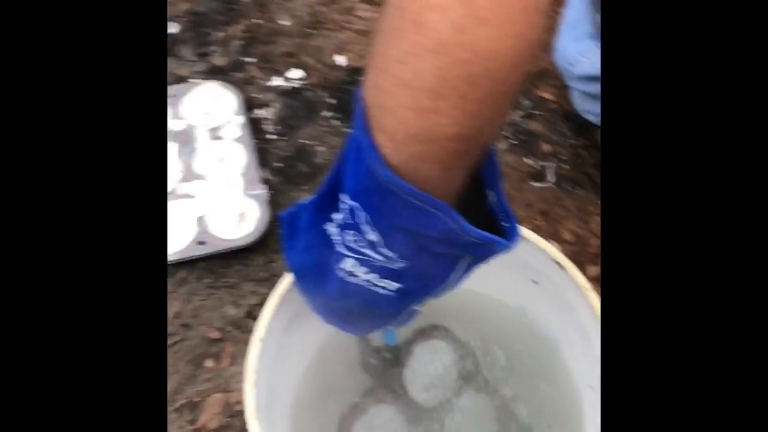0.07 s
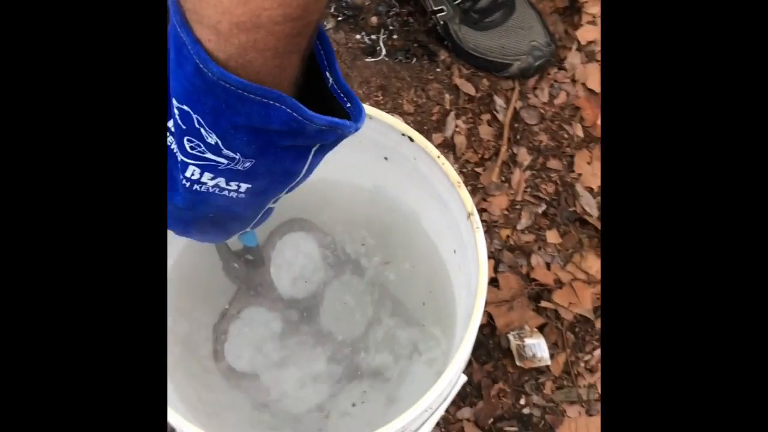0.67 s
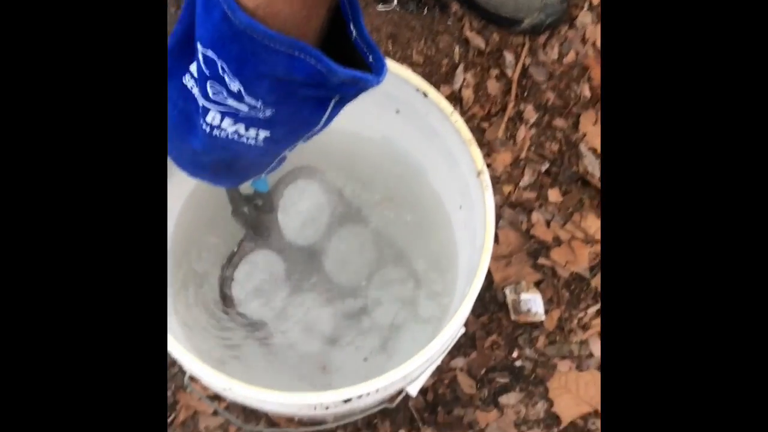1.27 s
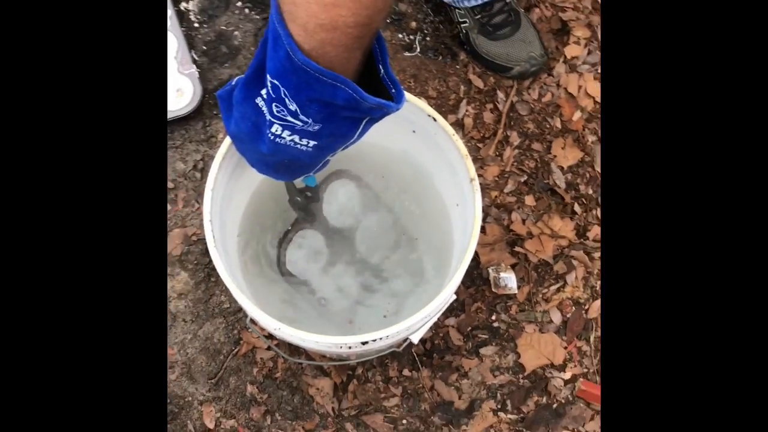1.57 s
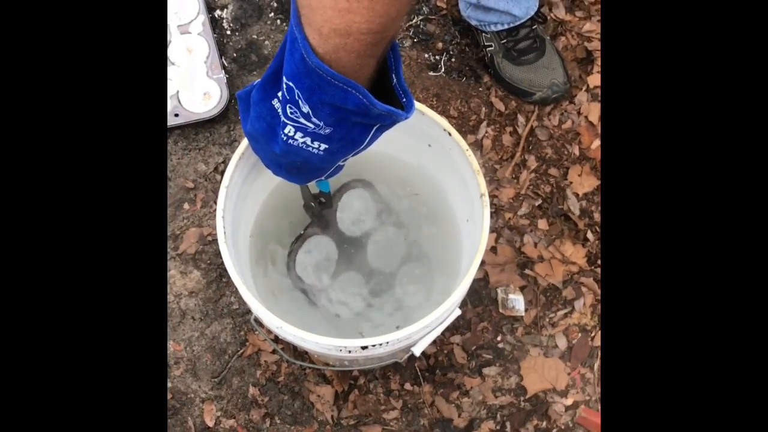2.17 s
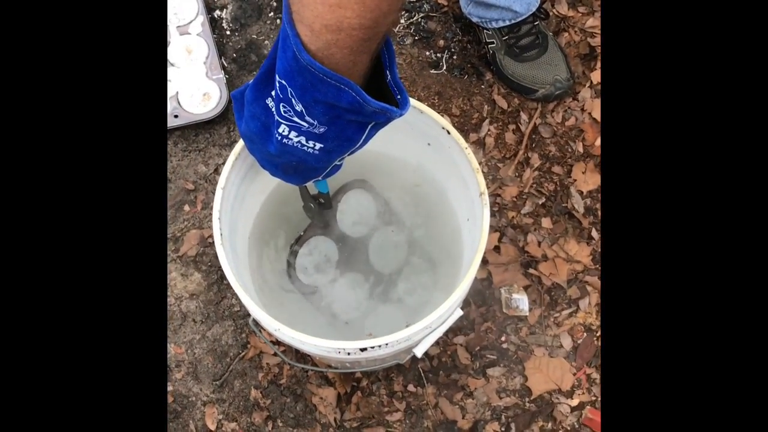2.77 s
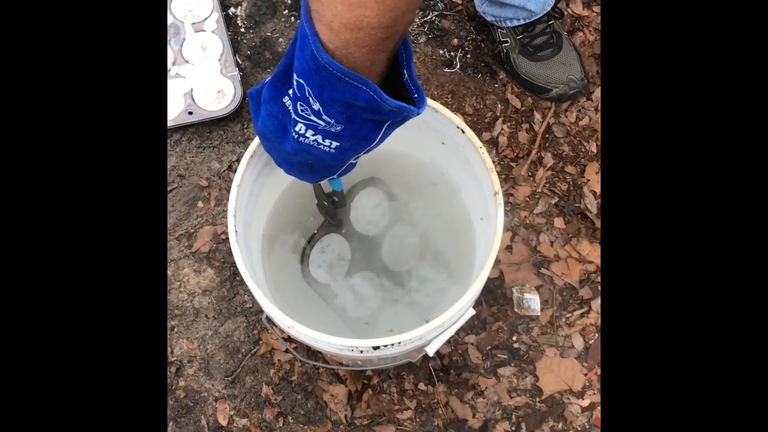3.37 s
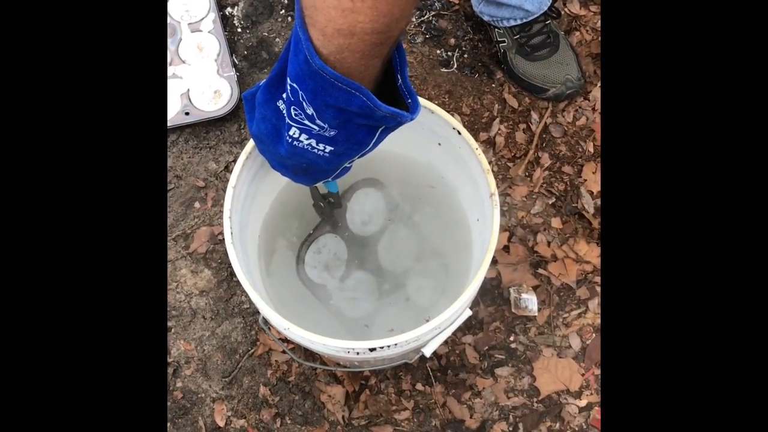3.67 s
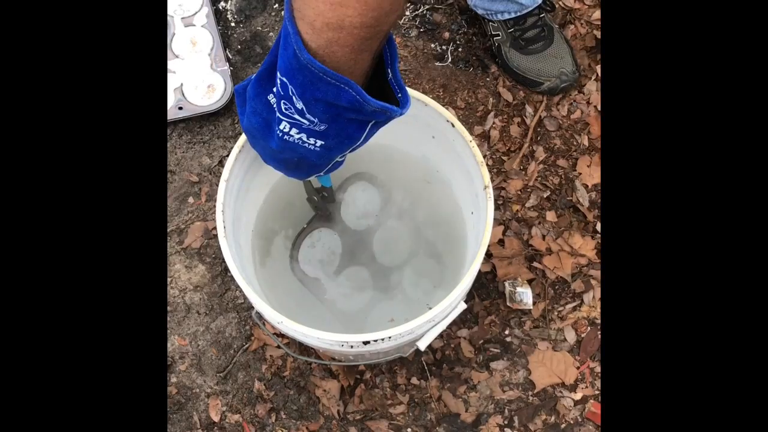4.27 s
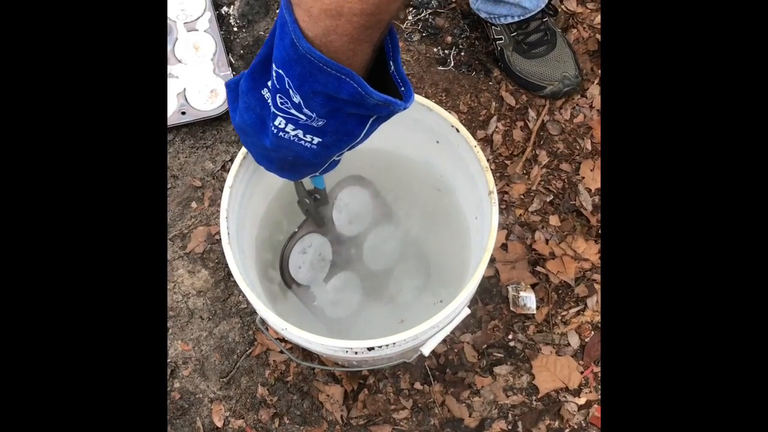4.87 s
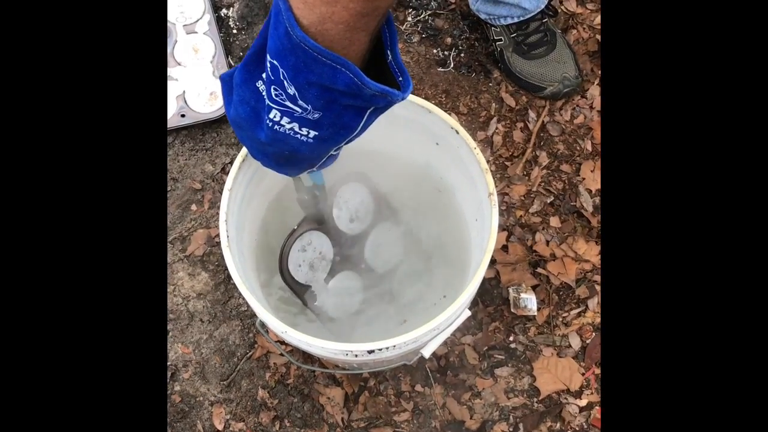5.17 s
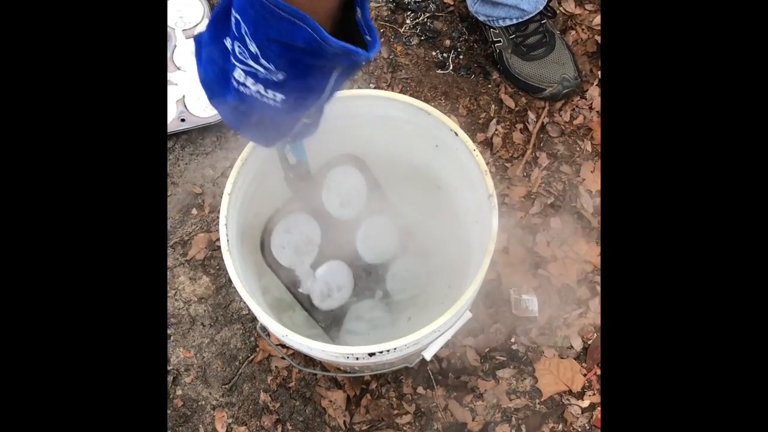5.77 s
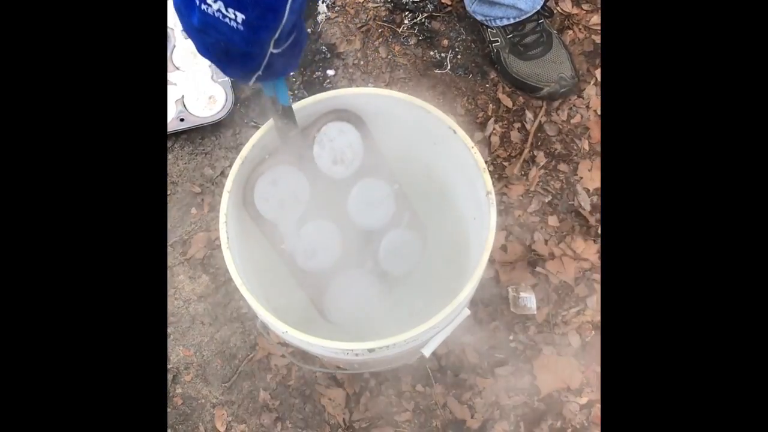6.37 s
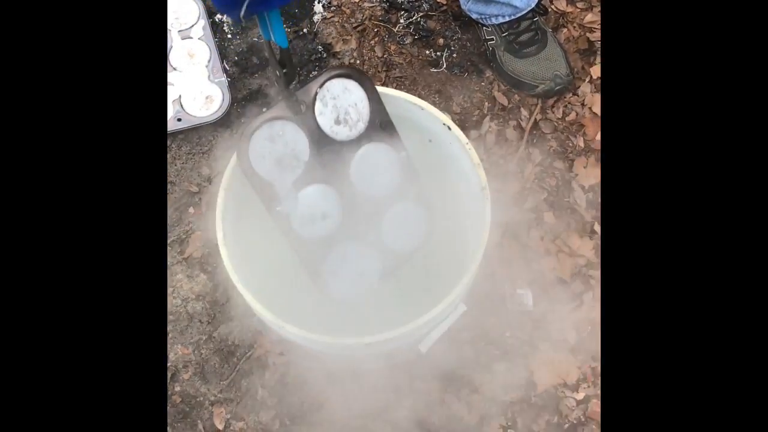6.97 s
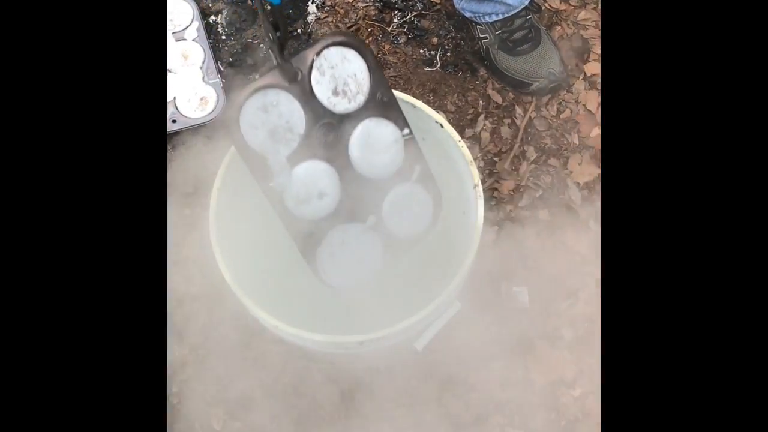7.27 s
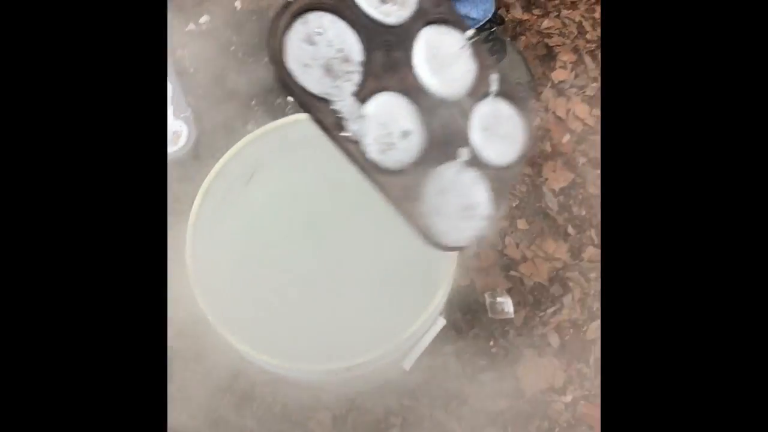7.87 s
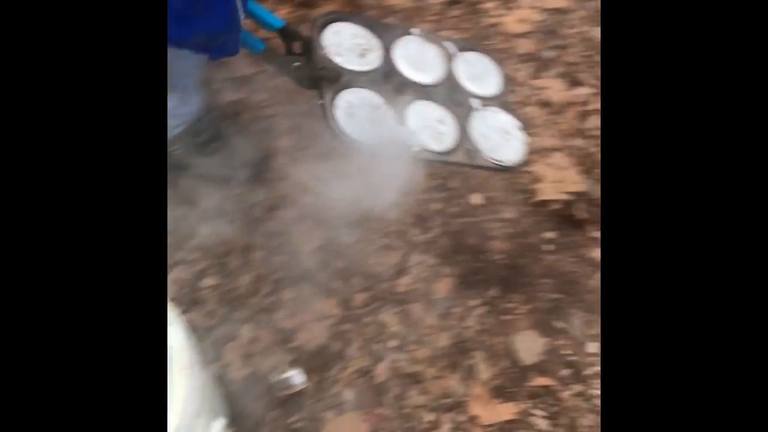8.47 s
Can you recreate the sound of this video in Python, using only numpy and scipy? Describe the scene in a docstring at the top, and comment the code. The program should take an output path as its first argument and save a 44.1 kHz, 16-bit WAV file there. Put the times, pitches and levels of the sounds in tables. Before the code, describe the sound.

Water gurgles low around a quenched hot muffin tin, breaking into hissing, popping knocks and dry snaps over a faint roar.

```python
"""A hot aluminium tin is quenched in a bucket of water outdoors. A vapour film wraps it and sheds bubbles
that make the bucket rumble; then water touches the metal and sizzles. As the tin is lifted, steam pockets
collapse with sharp knocks, thinning out to spits. Something roars and whines faintly nearby, and one soft
footstep falls near the end."""
import sys
import numpy as np
from scipy import signal
from scipy.fft import rfft, irfft, next_fast_len
from scipy.io import wavfile
from scipy.ndimage import map_coordinates

SR = 44100
rng = np.random.default_rng(int(sys.argv[2]) if len(sys.argv) > 2 else 0)


def inscribe(sig):
    """Save sig as 16-bit PCM at rate SR to the path in sys.argv[1].

    A 1-D sig is mono; a 2-D sig holds one channel per row.
    Samples are clipped to [-1, 1] before scaling.
    """
    pcm = np.round(np.clip(np.atleast_2d(sig).T, -1, 1) * 32767)
    wavfile.write(sys.argv[1], SR, pcm.astype(np.int16))


N = 379260

# steam pockets collapsing: start_s, knock_db, boom_offset_db, spray_offset_db
COLLAPSES = [(4.869, -13, -8, -23), (4.907, -9.5, -9.5, -18), (4.953, -13, -7.5, -17),
             (5.089, -17, -7.5, -19), (5.16, -11, -9.5, -12), (5.206, -18, -5.5, -22),
             (5.232, -15, -10, -15.5), (5.278, -13.5, -9, -11), (5.296, -10.5, -19, -12.5),
             (5.414, -14, -13, -24), (5.433, -20, -3.5, -3), (5.463, -8, -11, -14), (5.555, -12, -20, -18),
             (5.593, -5, -11, -12), (5.723, -9.5, -5, -11.5), (5.748, -10.5, -11.5, -46),
             (5.796, -12, -14, -30), (5.863, -7, -9.5, -11.5), (5.962, -17.5, -7.5, -6),
             (6.066, -5.5, -4.5, -12.5), (6.244, -14, -14, -11.5), (6.355, -9.5, -9.5, -17),
             (6.484, -11, -13.5, -14), (6.601, -11, -12.5, -21), (6.73, -6.5, -10.5, -19.5),
             (6.739, -11.5, -14, -13.5), (6.75, -7.5, -10.5, -21), (6.769, -11, -15, -15),
             (6.82, -24, -25, -5), (6.849, -19.5, -12, -15), (6.902, -20.5, -11, -8.5),
             (7.022, -10, -13, -19), (7.136, -24, -13, -7), (7.16, -23, -18, -6), (7.259, -14, -17.5, -14),
             (7.356, -19, -38, -17), (7.405, -18.5, -23, -9), (7.522, -18.5, -22, -9),
             (7.67, -11.5, -22.5, -16), (7.798, -12.5, -38, -15.5), (7.993, -10, -25, -19.5)]
# tin leaving the water: time_s, share_above_surface
LIFT = [(6.05, 0.04), (6.5, 0.83)]
# struck bucket, long ring and short thump: pitch_hz, level_db, t60_s
BOOM_MODES = [(339.4, -4.5, 0.09), (366, 2, 0.024)]
# wet cups of the tin: pitch_hz, level_db, t60_s
CUP_MODES = [(900, -13.5, 0.063), (1264, -1, 0.072), (1730, -4.5, 0.039)]
# resonances around a burst above water: pitch_hz, width_hz, level_db
LIFTED_MODES = [(652, 120, -1), (967, 380, 2), (1262, 176, -1.5), (1810, 440, -9)]
# spray and fizz: frequency_hz, level_db
SPRAY_SPECTRUM = [(300, -19), (1400, 10.5), (2050, 3.5), (2800, 5.5), (3400, -2), (4100, 4.5), (5000, -3.5),
                  (6150, 1.5), (8200, -5), (9500, -5), (10400, -9), (12000, -2.5), (16000, -7.5)]

SLAM_SPIKE = 1.4  # pressure spike re the cluster after it
BOOM_SCATTER, CUP_SCATTER = 0.034, 0.01  # log spread of pitch
BOOM_ATTACK_S = 0.00076


def amp(db):
    """Decibels to gain."""
    return 10 ** (np.asarray(db) / 20)


def unit(x):
    """Scale to rms 1."""
    return x / np.sqrt(np.mean(x ** 2) + 1e-20)


def curves(rows):
    """One value per sample for each column after the time."""
    time_s, *columns = np.transpose(rows)
    return [np.interp(np.arange(N) / SR, time_s, column) for column in columns]


def wobble(rate_hz):
    """Smooth random curve."""
    knots = rng.standard_normal(int(N * rate_hz / SR) + 4)
    return map_coordinates(knots, [np.arange(N) * rate_hz / SR])


def bubble_times(rate_hz, regularity):
    """Start times of a loosely periodic stream."""
    times_s = np.cumsum(rng.gamma(regularity, 1 / (regularity * rate_hz), 1000))
    return times_s[times_s < (N - 1) / SR]


def add(track, start_s, sound):
    """Mix a sound into a track."""
    span = track[max(round(start_s * SR), 0):][:len(sound)]
    span += sound[:len(span)]


def butter(x, hz, kind, order):
    """Causal low-pass or high-pass."""
    return signal.sosfilt(signal.butter(order, hz, kind, fs=SR, output="sos"), x)


def coloured(x, spectrum):
    """Minimum-phase filter of unit energy."""
    size = 8192
    hz, db = np.transpose(spectrum)
    gain = amp(np.interp(np.log(np.fft.rfftfreq(size, 1 / SR) + 1), np.log(hz), db))
    cepstrum = irfft(np.log(gain))
    cepstrum[1:size // 2] *= 2
    cepstrum[size // 2 + 1:] = 0
    kernel = irfft(np.exp(rfft(cepstrum)))
    return signal.fftconvolve(x, kernel / np.linalg.norm(kernel))[:N]


def resonate(x, modes):
    """Resonator bank of unit energy."""
    size = next_fast_len(N + SR // 4)
    f = np.fft.rfftfreq(size, 1 / SR)
    response = sum(amp(db) * 1j * f * width_hz / (hz * hz - f * f + 1j * f * width_hz)
                   for hz, width_hz, db in modes)
    response /= np.sqrt(np.mean(np.abs(response) ** 2))
    return irfft(rfft(x, size) * response, size)[:N]


def ring(modes, scatter, attack_s):
    """One blow on damped modes of scattered pitch and strength, peak 1."""
    t = np.arange(SR // 8) / SR
    hz, db, t60_s = np.transpose(modes)[:, :, None]
    detune, strength = rng.standard_normal((2, len(modes), 1))
    envelopes = amp(db + 2.7 * strength - 60 * t / t60_s)
    tone = (envelopes * np.sin(2 * np.pi * hz * np.exp(scatter * detune) * t)).sum(0)
    tone *= 1 - np.exp(-t / attack_s)
    return tone / np.abs(tone).max()


def burst(t60_s, clump_db=4, hold_s=0):
    """Cluster of tiny implosions that holds and dies, energy 1."""
    t = np.arange(SR // 8) / SR
    clumps = np.interp(t, np.linspace(0, t[-1], 80), rng.standard_normal(80))
    decay_db = 60 * np.maximum(t - hold_s, 0) / t60_s
    noise = rng.standard_normal(len(t)) * amp(clump_db * clumps - decay_db)
    return noise / np.linalg.norm(noise)


def implosion(t60_s, spike=SLAM_SPIKE):
    """Pressure spike followed by a cluster of tiny collapses, energy 1."""
    click = burst(t60_s)
    click[0] += spike
    return click / np.linalg.norm(click)


def hollow(x):
    """Bucket resonances sink as the tin rises; the water muffles what lies above them."""
    # resonances deep in the bucket: pitch_hz, width_hz, level_db
    sunk_modes = [(535, 57, 8.5), (831, 63, 8.5), (985, 370, -1), (1296, 43, 4), (1514, 34, -1),
                  (1693, 36, 2.5)]
    # their glide: time_s, pitch_ratio
    glide = [(5.55, 0.94), (5.9, 0.87), (6.4, .79)]
    pitch_ratio, = curves(glide)
    warped_s = np.cumsum(pitch_ratio) / SR
    out, energy = np.zeros(N), 0
    for hz, width_hz, db in sunk_modes:
        phase = np.float32(2 * np.pi * hz * warped_s)
        loss = np.pi * width_hz / SR
        for carrier in np.cos(phase), np.sin(phase):
            baseband = signal.lfilter([loss], [1, loss - 1], x * carrier + 1e-20)
            out += 2 * amp(db) * carrier * baseband
        energy += amp(db) ** 2 * loss
    return butter(out / np.sqrt(energy), hz=1820, kind="low", order=3)


def film_boiling():
    """The vapour film sheds bubbles that thump the bucket; smaller ones pop between the cups."""
    # boiling strength: time_s, glug_db, simmer_db
    boil = [(0, -29.5, -45), (1.3, -28, -37.5), (1.9, -28, -39.5), (3.4, -28.5, -41.5), (3.7, -29, -37.5),
            (4.1, -27.5, -43), (4.65, -28.5, -33), (4.95, -32, -30.5), (6.1, -44, -31.5), (6.6, -58, -44.5),
            (8.6, -58.5, -41)]
    # biggest vapour bubbles: start_s, level_db
    big_glugs = [(1.191, -20), (1.522, -19), (1.594, -21), (2.233, -16), (2.394, -20.5), (2.69, -16),
                 (2.803, -21.5), (2.934, -20), (3.704, -17.5), (3.942, -18)]
    # clearest underwater pops: start_s, level_db
    clear_pops = [(1.18, -27), (1.417, -22), (1.655, -25.5), (3.006, -27), (3.154, -26.5), (3.223, -25.5),
                  (3.381, -23.5), (3.432, -28.5), (3.653, -27), (3.693, -23.5), (3.881, -25.5),
                  (4.037, -23), (4.258, -22.5), (4.64, -25), (4.777, -19), (4.828, -20.5), (5.056, -19.5),
                  (5.374, -22), (6.124, -20.5)]
    # low resonances of the filled bucket: pitch_hz, width_hz, level_db
    bucket_modes = [(253.4, 18, -1), (342, 24.2, 3)]
    glug_hz, glug_t60_s, glug_scatter = 304.3, 0.034, 0.09
    plink_hz, plink_t60_s, plink_scatter = 1286, 0.031, 0.154
    glug_db, simmer_db = curves(boil)
    lift, = curves(LIFT)
    glugs, pops, clicks, snaps = np.zeros((4, N))
    shed = [(s, glug_db[int(s * SR)] + rng.normal(0.52, 2.1), glug_scatter)
            for s in bubble_times(rate_hz=46, regularity=5)]
    shed += [(s, db, BOOM_SCATTER) for s, db in big_glugs]
    for start_s, db, scatter in shed:
        add(glugs, start_s, amp(db) * ring([(glug_hz, 0, glug_t60_s)], scatter, attack_s=0.0039))
        add(clicks, start_s, amp(db + 1.5) * burst(t60_s=0.058))  # the neck pinches off
    simmer = [(s, simmer_db[int(s * SR)] + rng.normal(5.5, 3))
              for s in bubble_times(rate_hz=42, regularity=2)]
    for start_s, db in [*simmer, *clear_pops]:
        submerged = 1 - lift[int(start_s * SR)]
        boom = ring(BOOM_MODES, BOOM_SCATTER, BOOM_ATTACK_S)
        plink = ring([(plink_hz, 0, plink_t60_s)], plink_scatter, BOOM_ATTACK_S)
        add(pops, start_s, amp(db - 0.5) * submerged * boom + amp(db - 12) * plink)
        add(clicks, start_s, amp(db + 15.5) * implosion(t60_s=0.025))
        add(snaps, start_s, amp(db + 12) * burst(t60_s=0.015))
    rumble = amp(-20) * resonate(glugs, bucket_modes)
    muffled = butter(coloured(snaps, SPRAY_SPECTRUM), hz=5100, kind="low", order=2)
    return glugs + rumble + pops + hollow(clicks * np.cos(lift * np.pi / 2)) + muffled


def nearby_roar():
    """Steady roar with a thin whine, perhaps a furnace burner; the treble slowly fades."""
    # roar colour: frequency_hz, level_db
    spectrum = [(20, -43), (52, 0.5), (160, 6), (275, 5.5), (385, -5.5), (620, -9.5), (850, -6),
                (1900, -16), (2700, -12.5), (5000, -21.5), (7000, -21.5), (10400, -31), (16000, -35)]
    # roar strength: time_s, level_db
    levels = [(0, -38.5), (4.5, -36.5), (8.6, -42)]
    # treble shelf: time_s, gain_db
    treble = [(0, 2.5), (2, 0), (4.5, -1), (8.6, -4.5)]
    # whine: pitch_hz, width_hz, level_db
    whine_modes = [(2299, 17, 1.5), (4550, 17, -3)]
    level_db, = curves(levels)
    treble_db, = curves(treble)
    roar = amp(level_db) * coloured(rng.standard_normal(N), spectrum)
    roar += (amp(treble_db) - 1) * butter(roar, hz=513, kind="high", order=1)
    whine = amp(-57.5 + treble_db / 2) * resonate(rng.standard_normal(N), whine_modes)
    return roar + whine


def ticks():
    """Faint high ticks before the sizzle."""
    # ticks: start_s, level_db
    events = [(0.325, -18), (1.418, -26), (3.692, -20)]
    track = np.zeros(N)
    for start_s, db in events:
        add(track, start_s, amp(db) * burst(t60_s=0.061))
    return butter(track, hz=7000, kind="high", order=2)


def pings():
    """Tiny bubbles burst at the surface, each pitched by its size."""
    # surface bubbles: start_s, pitch_hz, peak_db
    bubbles = [(0.997, 3250, -30), (1.056, 3000, -30), (1.955, 3200, -29), (1.978, 2600, -30.5),
               (3.297, 8450, -31), (3.503, 2590, -28.5), (3.75, 3280, -28)]
    track = np.zeros(N)
    for start_s, pitch_hz, peak_db in bubbles:
        ping = signal.lfilter(*signal.iirpeak(pitch_hz, Q=11, fs=SR), implosion(t60_s=0.033))
        add(track, start_s, amp(peak_db) * ping / np.abs(ping).max())
    return track


def sizzle():
    """Water wets the metal: tiny steam bubbles fizz, break into spurts and flare at each collapse."""
    # fizz strength: time_s, level_db
    levels = [(4.8, -34.5), (4.95, -38.5), (5.38, -44), (5.7, -38.5), (5.85, -39.5), (6.15, -39),
              (6.33, -43.5), (6.68, -54), (8.18, -56.5), (8.21, -44), (8.27, -58), (8.6, -54.5)]
    # sharp hiss of first contact: pitch_hz, width_hz, level_db
    hiss_modes = [(6200, 3000, 0)]
    flare_db, flare_lead_s, flare_s = 0.8, 0.0023, 0.022
    spurt_db, spurt_growth_s = 4.5, 0.45
    crackle_rate_hz, hiss_fade_db_per_s = 64, 29
    level_db, = curves(levels)
    lift, = curves(LIFT)
    wetted, = curves([(4.785, 0), (4.82, 1)])
    age_s = np.maximum(np.arange(N) / SR - levels[0][0], 0)
    flares = np.zeros(N)
    for start_s, *_ in COLLAPSES:  # each pocket fills with steam
        add(flares, start_s - flare_lead_s - flare_s / 2, np.hanning(round(flare_s * SR)))
    flares *= 3.5 - lift
    depth_db = spurt_db * np.minimum(age_s / spurt_growth_s, 1) * (1 - lift / 2)
    spurts = amp(depth_db * wobble(rate_hz=50))
    fizz = unit(rng.standard_normal(N) * spurts * amp(1.8 * wobble(rate_hz=450)))
    impulses = 1.0 * (rng.random(N) < crackle_rate_hz / SR)
    crackle = unit(signal.fftconvolve(impulses, burst(t60_s=0.019))[:N])
    steam = wetted * amp(level_db + 3.5 + flare_db * flares) * (fizz + amp(-7) * crackle)
    hiss = wetted * amp(-36 - hiss_fade_db_per_s * age_s) * rng.standard_normal(N)
    return coloured(steam, SPRAY_SPECTRUM) + amp(-5.5) * hollow(steam) + resonate(hiss, hiss_modes)


def collapses():
    """Steam pockets slam shut with a knock, a bucket boom and spray, then rebound once, weaker."""
    # spray decay: submerged_t60_s, lifted_t60_s
    spray_t60_range_s = (.055, .025)
    rebound_s, rebound_scatter, rebound_loss_db = 0.017, 0.28, 11.5
    delays_s = rebound_s * np.exp(rebound_scatter * rng.standard_normal(len(COLLAPSES)))
    rebounds = [(start_s + delay_s, db - rebound_loss_db, *offsets_db)
                for (start_s, db, *offsets_db), delay_s in zip(COLLAPSES, delays_s)]
    booms, slams, splats, cups, spray = np.zeros((5, N))
    lift, = curves(LIFT)
    for start_s, db, boom_db, spray_db in [*COLLAPSES, *rebounds]:
        add(booms, start_s, amp(db + boom_db + 6) * ring(BOOM_MODES, BOOM_SCATTER, BOOM_ATTACK_S))
        add(slams, start_s, amp(db + 13.5) * implosion(t60_s=0.036))
        add(splats, start_s, amp(db + 16) * burst(t60_s=0.033, hold_s=0.0032))
        add(cups, start_s, amp(db - 7) * ring(CUP_MODES, CUP_SCATTER, attack_s=0.001))
        spray_t60_s = np.interp(lift[int(start_s * SR)], [0, 1], spray_t60_range_s)
        add(spray, start_s, amp(db + spray_db + 20.5) * burst(spray_t60_s, clump_db=3.5, hold_s=0.0025))
    # as the tin rises, deep slams give way to surface splats and the spray flies free
    fade_rad = lift * np.pi / 2
    deep = hollow(slams * np.cos(fade_rad))
    shallow = butter(resonate(splats * np.sin(fade_rad), LIFTED_MODES), hz=5000, kind="low", order=1)
    mist = coloured(spray * amp(9 * lift), SPRAY_SPECTRUM)
    return deep + shallow + lift * cups + mist + butter(booms, hz=236, kind="high", order=3)


def spits():
    """Drops flash to steam on the hot tin with dry snaps that ring its cups."""
    # drops: start_s, level_db
    drops = [(4.977, -12.5), (6.384, -9), (6.419, -16), (6.531, -14), (6.792, -16), (6.813, -15),
             (6.954, -19.5), (7.18, -12), (7.443, -17.5), (7.477, -15.5), (7.543, -12.5), (7.635, -16.5),
             (7.664, -7), (7.67, -4), (7.688, -13.5), (7.713, -18), (7.743, -17.5), (7.933, -18),
             (8.083, -17.5), (8.156, -17.5), (8.21, -18), (8.241, -20.5), (8.269, -29), (8.294, -21.5),
             (8.365, -17), (8.387, -19.5), (8.426, -19), (8.53, -21.5), (8.571, -19)]
    snaps, cups = np.zeros((2, N))
    for start_s, db in drops:
        add(snaps, start_s, amp(db) * implosion(t60_s=0.018, spike=0.67))
        add(cups, start_s, amp(db - 21) * ring(CUP_MODES, CUP_SCATTER, attack_s=0.00028))
    return amp(7) * resonate(snaps, LIFTED_MODES) + amp(3) * coloured(snaps, SPRAY_SPECTRUM) + cups


def footstep():
    """Soft low thud as the tin is carried off."""
    start_s, pitch_hz, t60_s = 7.9, 48.3, 0.25
    thud = ring([(pitch_hz, 0, t60_s)], scatter=0.03, attack_s=0.013)
    track = np.zeros(N)
    add(track, start_s, amp(-35) * thud * np.linspace(1, 0, len(thud)))
    return track


def scene():
    """Mono mix just above the bucket."""
    quench = film_boiling() + pings() + collapses() + spits() + ticks() + sizzle()
    return (quench + nearby_roar() + footstep())[None]


def record(dry):
    """Brick-wall low-pass."""
    top_hz = 15900
    size = next_fast_len(N + SR // 2)
    passband = np.fft.rfftfreq(size, 1 / SR) < top_hz
    return irfft(rfft(dry, size) * passband, size)[:, :N]


dry = scene()
out = record(dry)
inscribe(out)
```